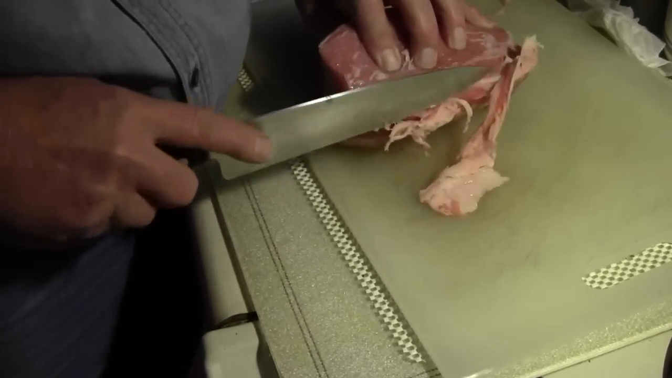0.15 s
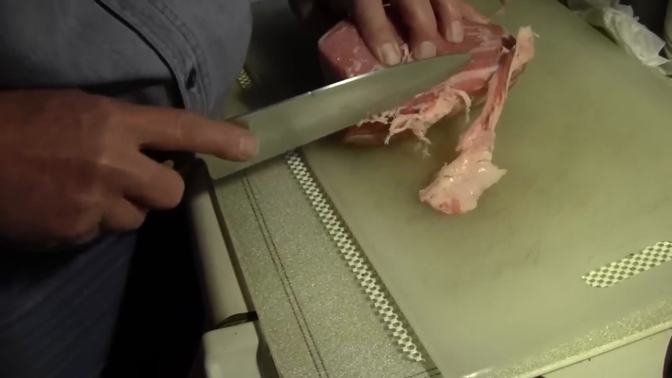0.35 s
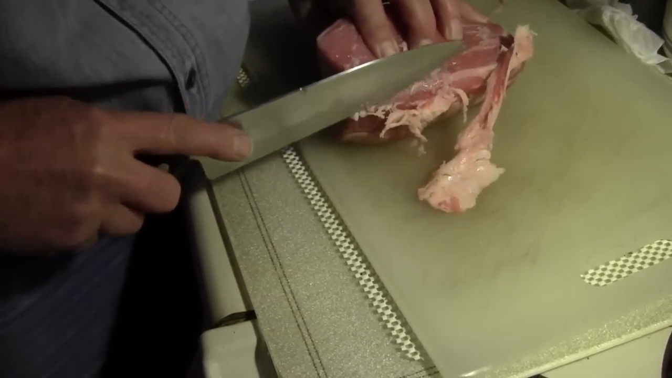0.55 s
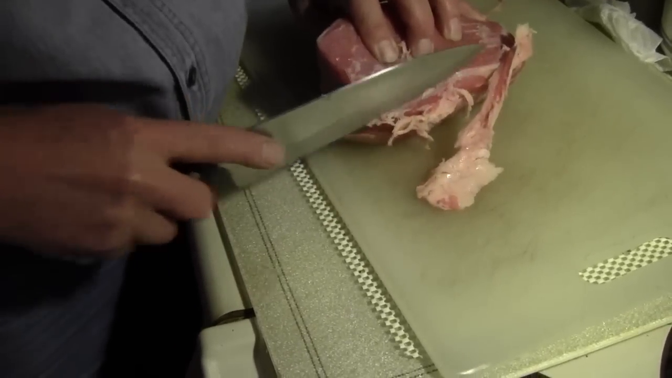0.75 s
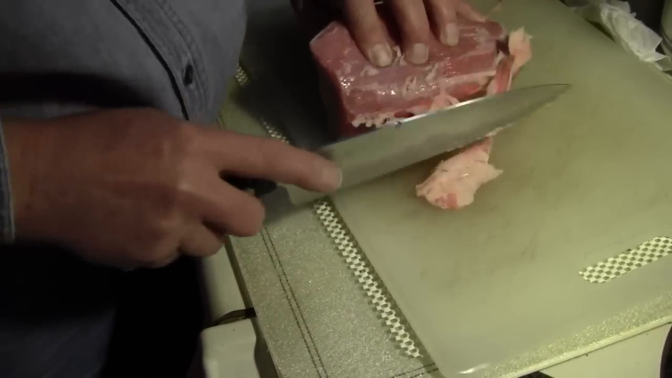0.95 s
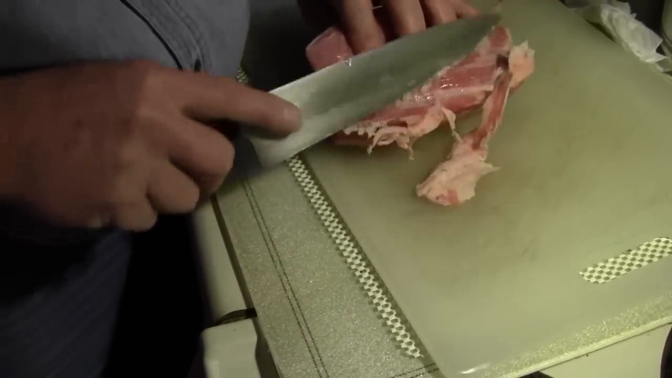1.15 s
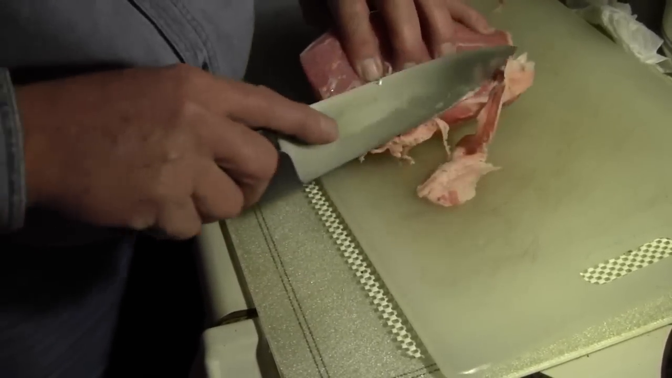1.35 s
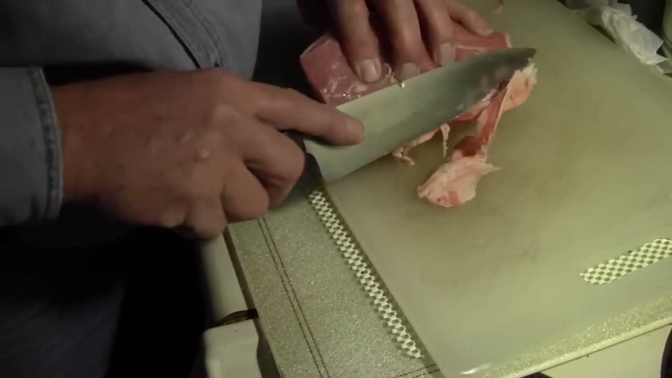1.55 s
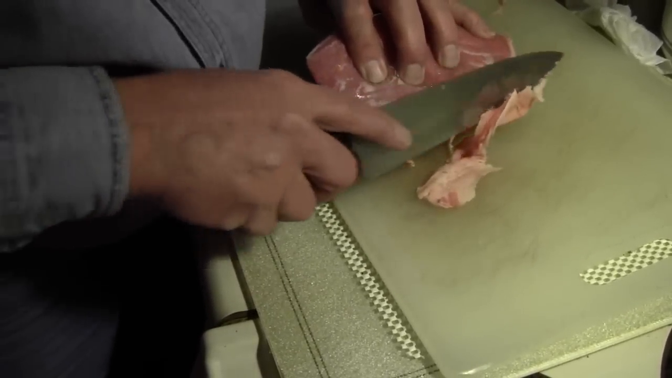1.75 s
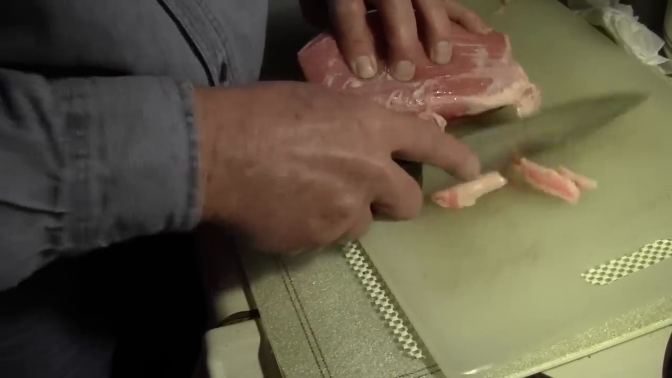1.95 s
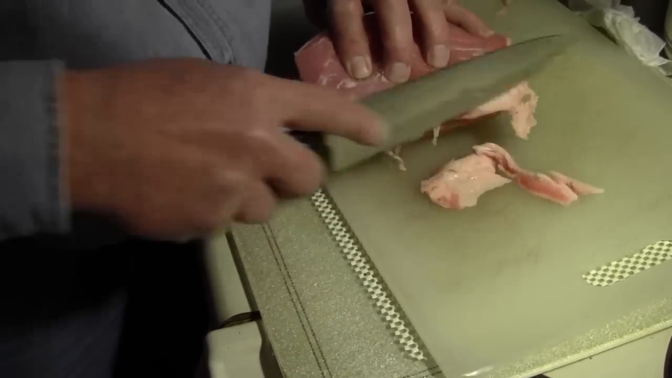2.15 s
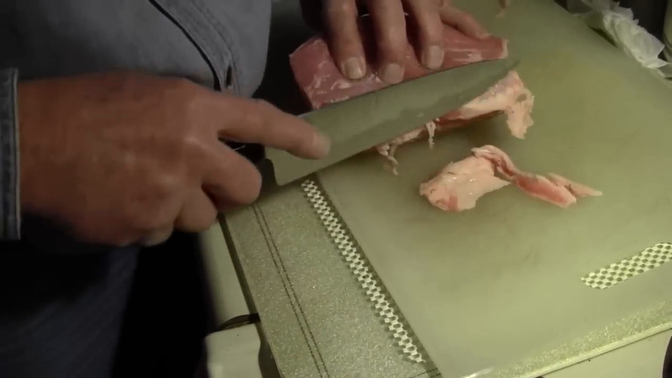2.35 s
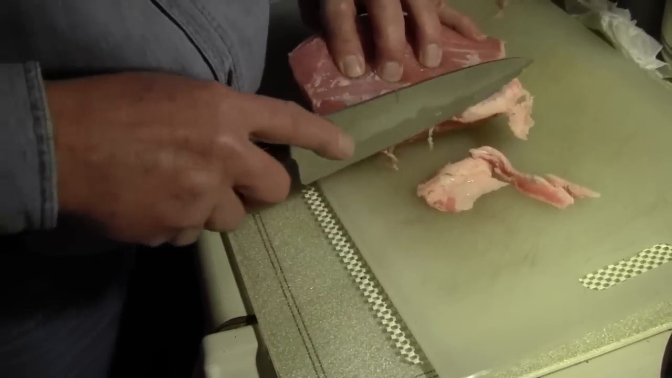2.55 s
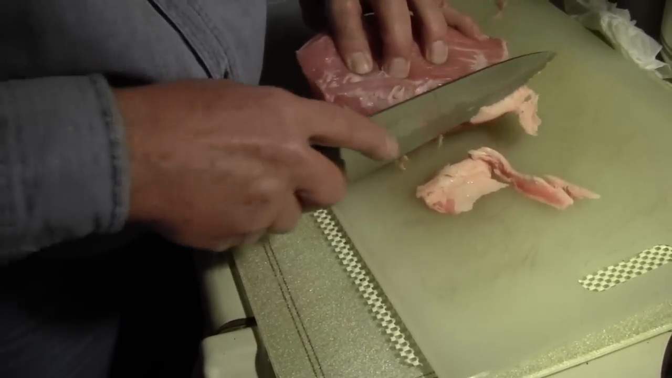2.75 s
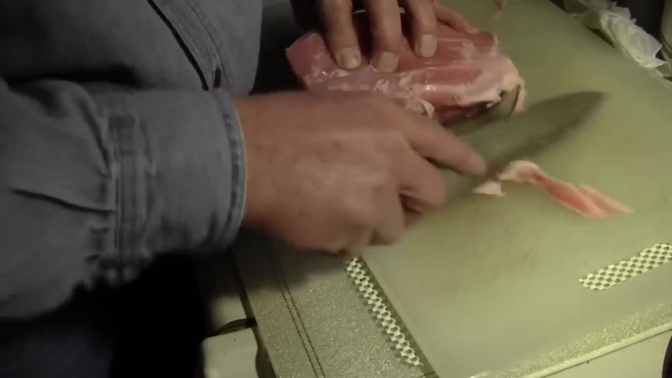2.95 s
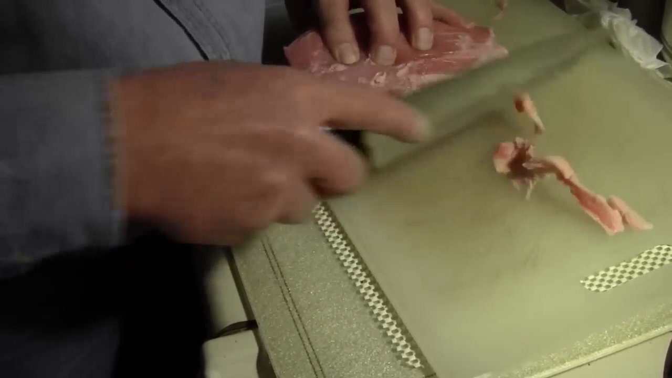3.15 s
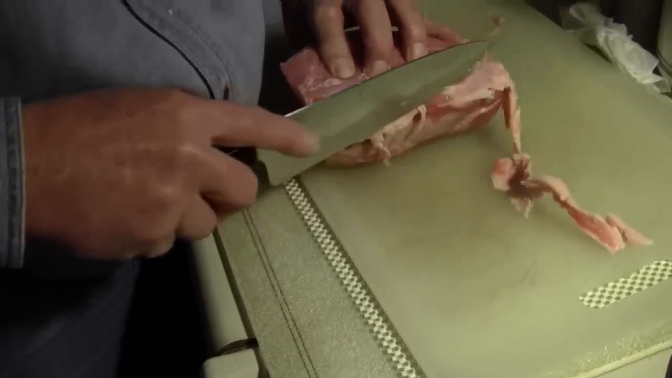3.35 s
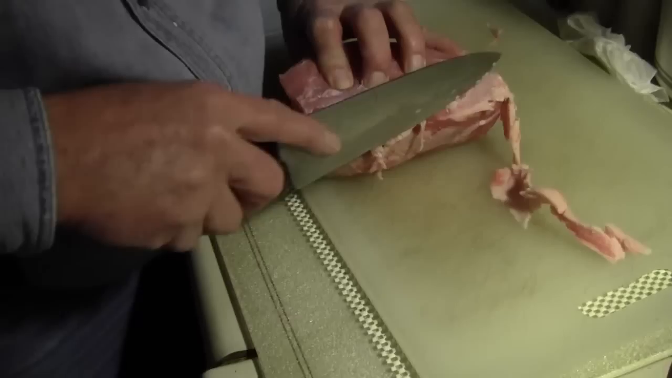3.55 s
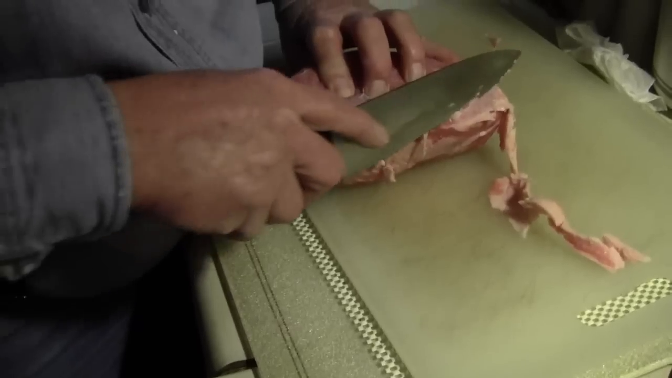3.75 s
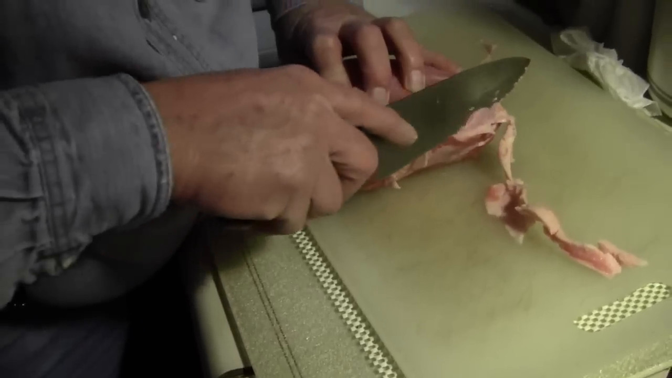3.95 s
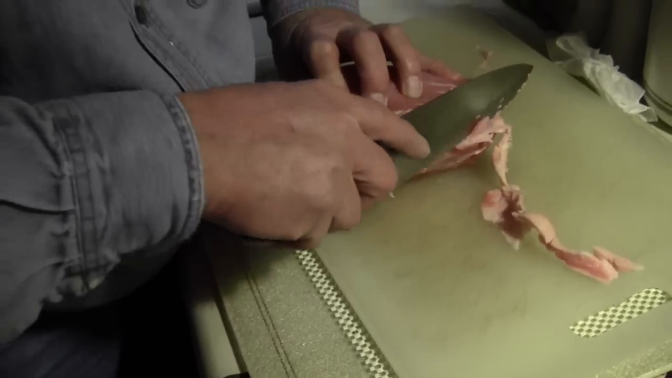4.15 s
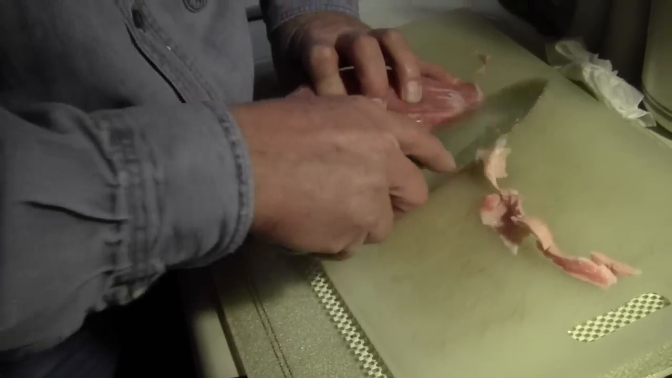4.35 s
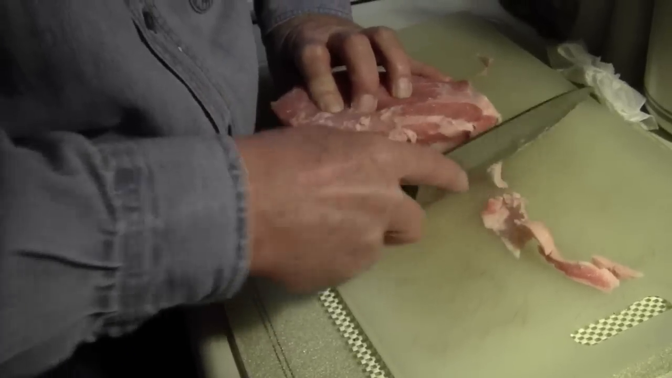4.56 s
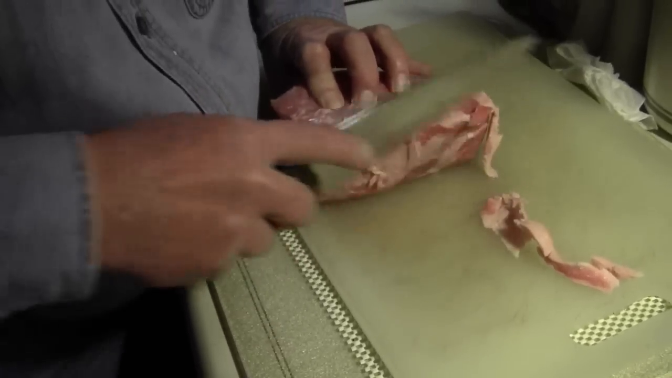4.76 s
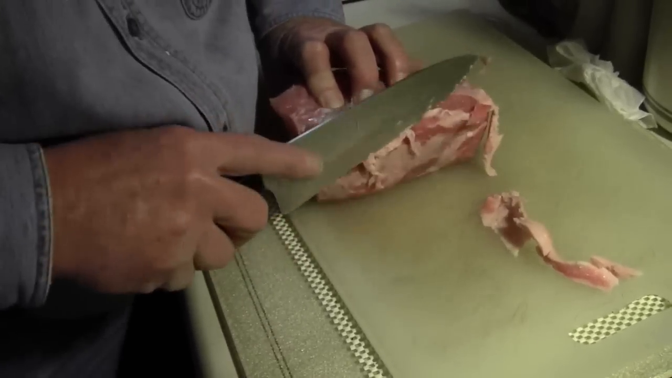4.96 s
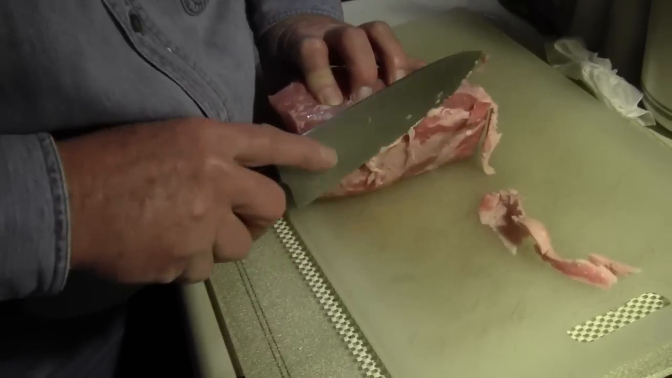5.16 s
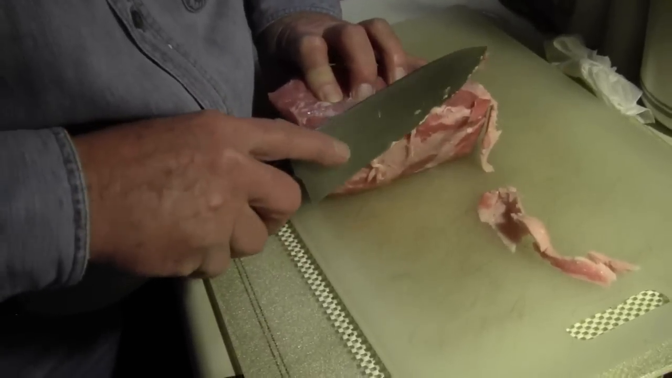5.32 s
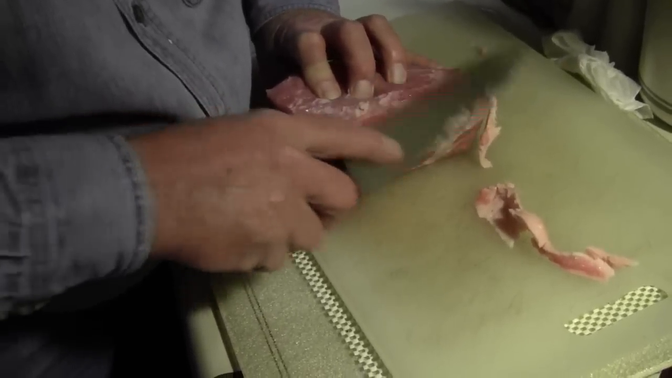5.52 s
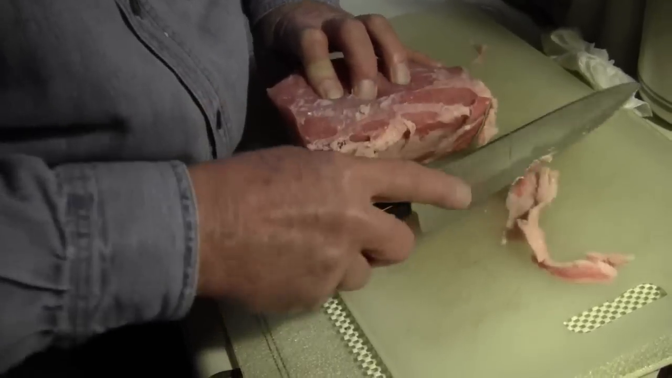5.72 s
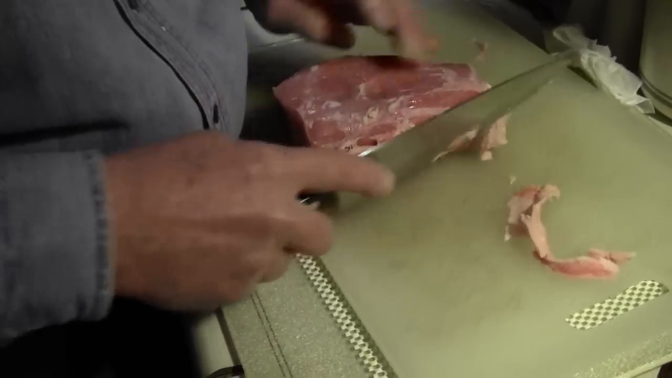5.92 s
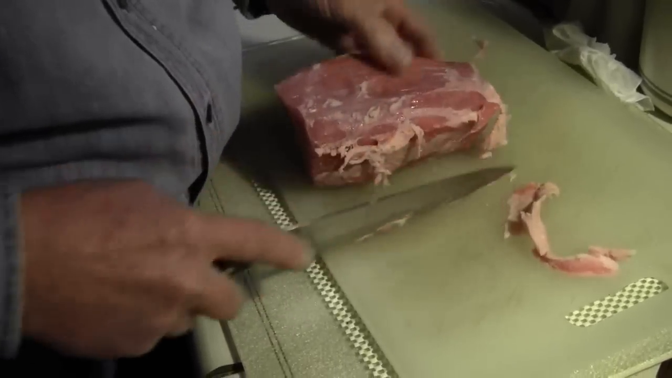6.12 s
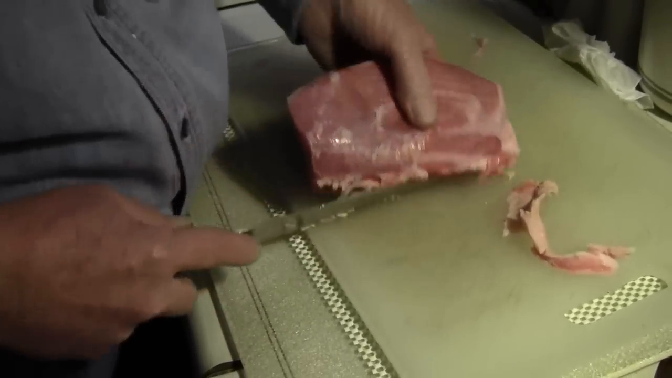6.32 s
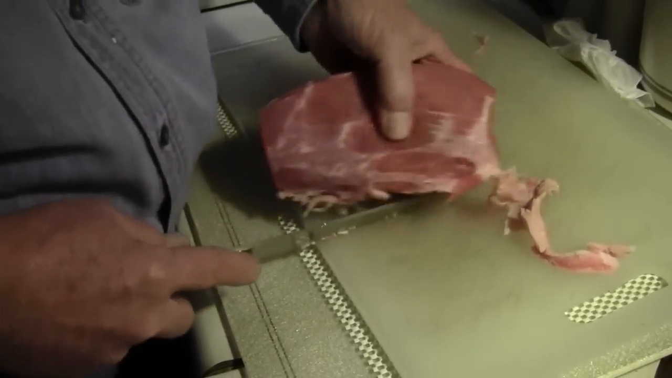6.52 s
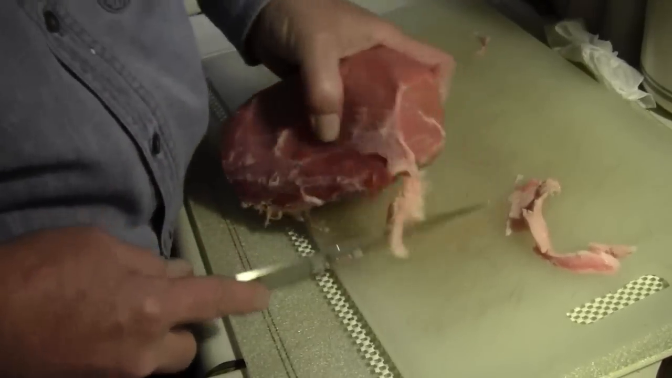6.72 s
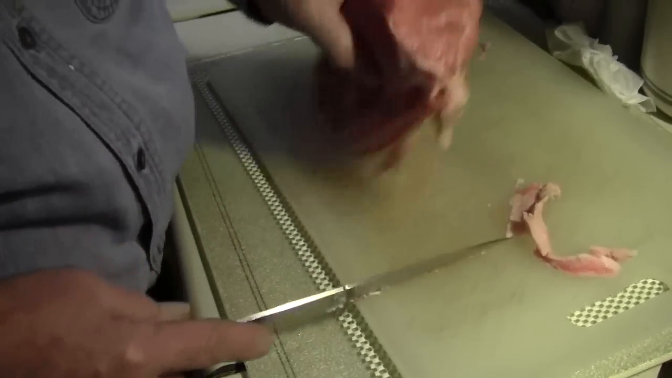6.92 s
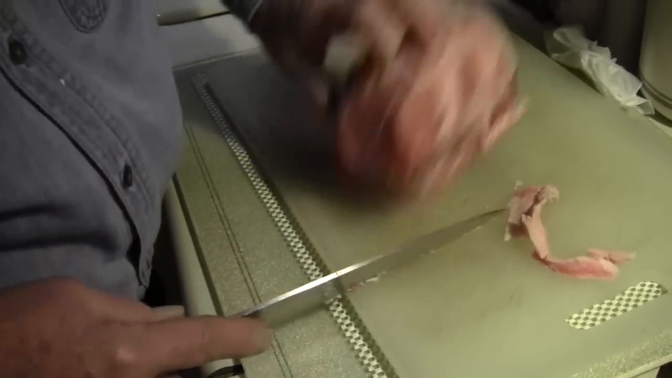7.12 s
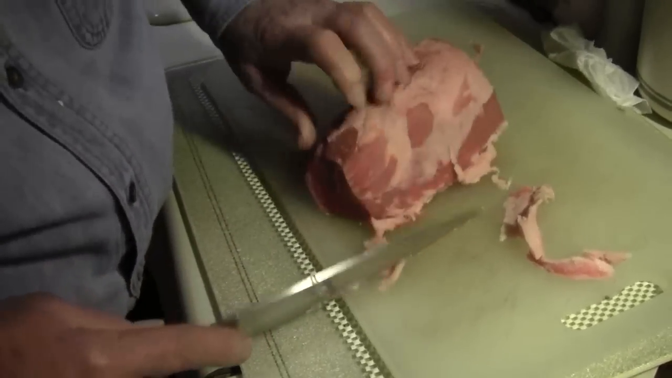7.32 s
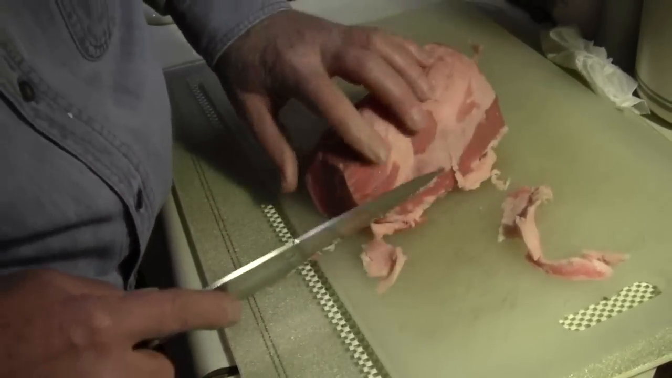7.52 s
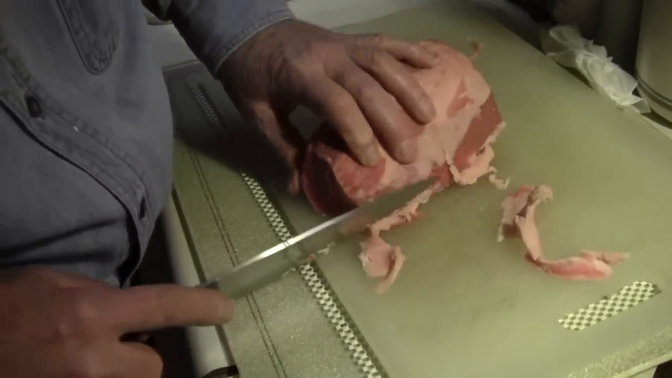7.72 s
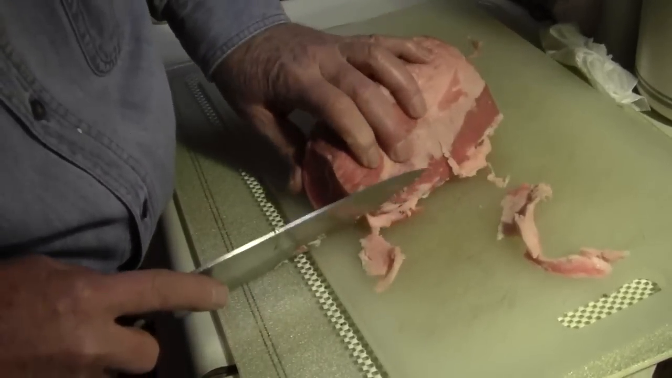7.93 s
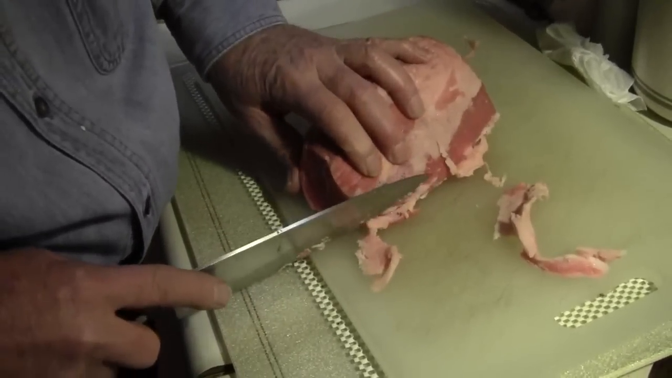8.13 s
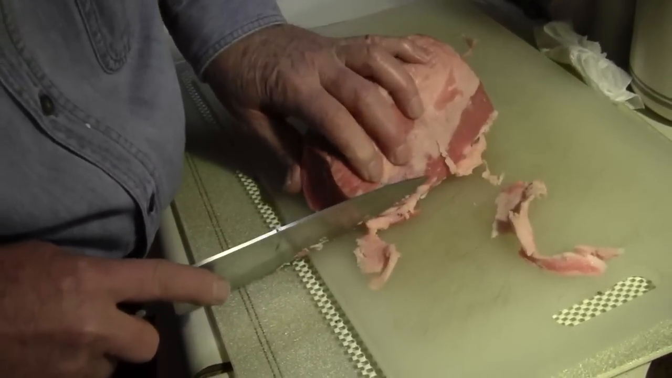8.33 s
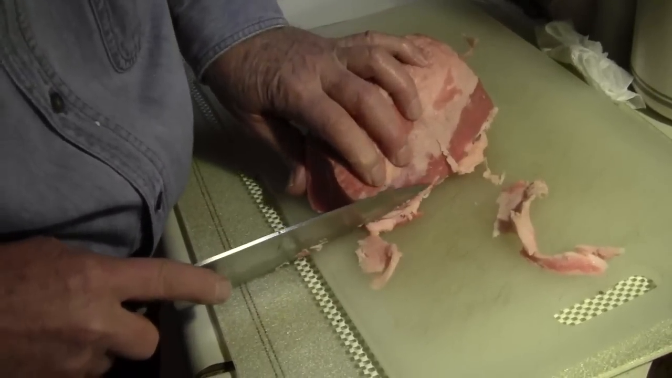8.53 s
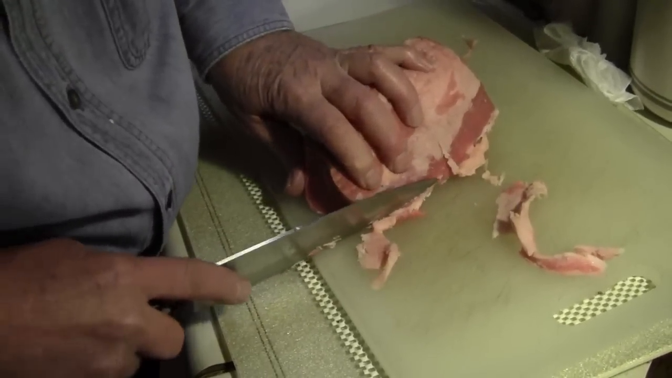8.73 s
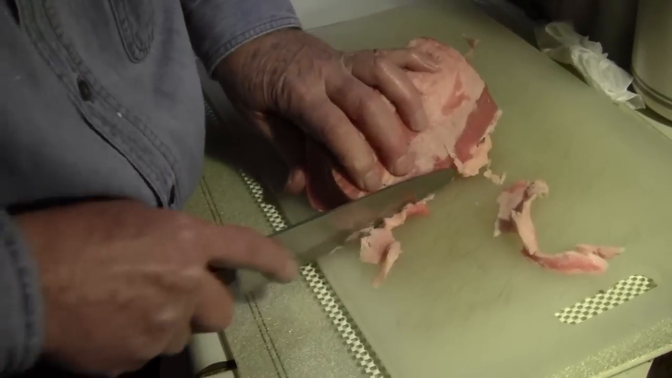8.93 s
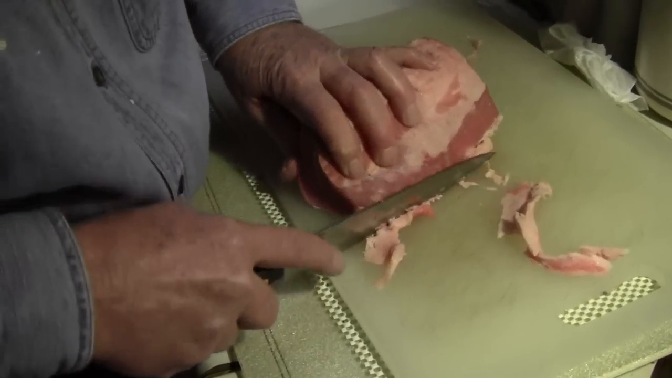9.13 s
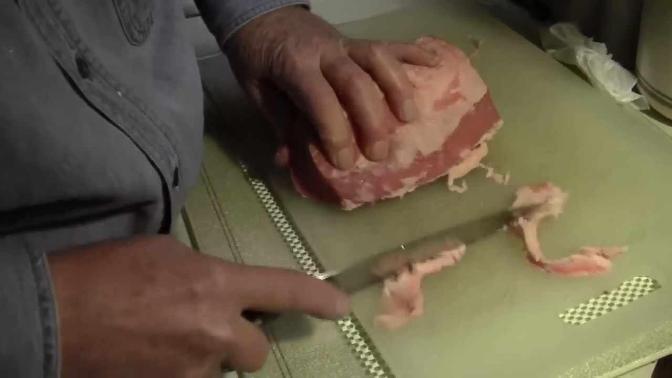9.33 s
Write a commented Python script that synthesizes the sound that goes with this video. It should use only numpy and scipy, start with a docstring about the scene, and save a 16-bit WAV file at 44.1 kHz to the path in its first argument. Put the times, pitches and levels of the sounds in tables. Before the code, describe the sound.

Faint wet slicing and three sharp knife knocks on a plastic board in a small kitchen, then a clattering thud of meat and a scrape.

```python
"""Trimming meat on a plastic board.

A large knife hisses through wet fibres and knocks three times on the board, ringing its modes.
The joint is turned and dropped: the board clatters on the counter with a thin high ring, crockery clinks.
At the end the edge scrapes a scrap aside in stick-slip. Sleeves rustle, an appliance hums faintly,
and the small kitchen reflects the blows and scrapes."""
import sys
import numpy as np
from scipy import signal
from scipy.fft import rfft, irfft
from scipy.io import wavfile

SR = 44100
rng = np.random.default_rng(int(sys.argv[2]) if len(sys.argv) > 2 else 0)


def bounce(signal):
    """Save signal as a 16-bit WAV file at the path given by the first command-line argument."""
    frames = np.transpose(np.atleast_2d(signal))
    limited = np.clip(frames, -1, 1)
    pcm = np.round(limited * 32767).astype(np.int16)
    wavfile.write(sys.argv[1], SR, pcm)


N = 413658
TIME_S = np.arange(N) / SR
BLOW_S = TIME_S[:SR // 3]
BAND_EDGES_HZ = np.geomspace(70, 14000, 24)

# blade hits board: t/s, level/dB, low-pass/Hz, crack/dB, spot f/Hz, spot/dB, thump/dB, thump f/Hz
KNOCKS = [(2.0298, 1, 4400, -15, 2884, -3, -36.5, 126), (3.079, 0.5, 4750, -18, 2300, -15, -30, 113),
          (4.57, -1, 5200, -14, 2550, 1, -28, 107)]
# board touched or clattering: t/s, level/dB, low-pass/Hz, t60/s, counter thump/dB
TAPS = [(4.823, -40, 4980, 0.16, -73), (4.836, -40, 3500, 0.091, -51), (5.774, -49, 600, 0.22, -39.5),
        (6.337, -36, 3600, 0.081, -39), (6.643, -36.5, 2050, 0.07, -67), (6.947, -46.5, 2870, 0.13, -73),
        (7.3259, -18.5, 8600, 0.056, -57), (7.3341, -17.5, 2500, 0.035, -37),
        (7.3370, -13.5, 6600, 0.057, -26), (7.3480, -18, 1200, 0.086, -38), (7.352, -17, 650, 0.023, -38),
        (7.3683, -9.5, 7140, 0.16, -22.5), (7.3878, -14, 5400, 0.02, -38), (7.3946, -13, 4150, 0.052, -33),
        (7.4089, -15.5, 3860, 0.21, -25), (7.445, -23.5, 4630, 0.17, -26), (7.62, -40.5, 5000, 0.17, -39),
        (7.667, -43.5, 3000, 0.11, -42), (7.698, -48.5, 695, 0.044, -48), (7.851, -54, 900, .06, -42.5),
        (8.126, -51.5, 990, 0.14, -47), (8.826, -51.5, 1100, 0.058, -46), (8.9419, -34.5, 9000, 0.049, -55),
        (8.9645, -37.5, 8900, 0.046, -44), (9.009, -45, 5000, 0.055, -44.5), (9.277, -50, 7900, 0.044, -73)]
# ring onsets: t/s, level/dB
JOINT_THUDS = [(6.339, -30), (7.334, -11.5), (7.348, -13.5)]
HIGH_RINGS = [(4.823, -47.5), (4.837, -39), (7.372, -36)]
CROCKERY_CLINKS = [(7.622, -41.5), (7.667, -49.5)]
# movements: peak t/s, level/dB, swell/s, fade/s
WET_STROKES = [(0.02, -62, .2, 0.55), (.5, -64.5, 0.22, 0.67), (.99, -55, 0.2, 0.13),
               (1.42, -58.5, 0.31, 0.51), (2.005, -47.5, 0.11, 0.029), (2.075, -48, .01, .02),
               (2.6, -65.5, 0.51, 0.43), (3.06, -48, 0.098, 0.02), (3.2, -59.5, 0.12, 0.34),
               (4.03, -61.5, 0.31, 0.32), (4.52, -56.5, 0.13, 0.08), (5.68, -58, .14, 0.22),
               (5.96, -59, 0.16, .15), (6.42, -54.5, 0.25, 0.37), (6.76, -57.5, .03, .03),
               (7.31, -59, 0.18, 0.037), (7.82, -54.5, 0.19, 0.34), (8.27, -62, 0.049, .08),
               (9.13, -61, 0.4, 0.88)]  # blade through meat, meat over board
BOARD_DRAGS = [(6.405, -51, 0.026, .13), (8.985, -45, 0.017, 0.043), (9.083, -42, 0.023, 0.039),
               (9.16, -52, 0.055, 0.06), (9.331, -32, 0.0031, .03), (9.358, -23, 0.021, 0.052)]
SLEEVE_SHIFTS = [(1.0, -58.5, .12, 0.14), (1.4, -62, 0.22, 0.16), (3.39, -46, 0.019, 0.059),
                 (5.84, -52, 0.19, .07), (6.02, -55.5, 0.14, .1), (6.45, -53.5, 0.27, 0.11),
                 (6.84, -56, .04, 0.034), (7.6, -51, 0.26, 0.41), (8.27, -53, 0.053, 0.065)]
# modes: f/Hz, level/dB, t60/s
BOARD_MODES = [(292, -22, 0.067), (428, -14, 0.029), (709, -16.5, 0.087), (978, -22.5, 0.13),
               (1190, -10.5, 0.04), (1293, -12, 0.068), (1718, -12.5, 0.043), (2278, -9, 0.027),
               (2477, -14, 0.061), (2935, -12.5, 0.03), (5850, -28, 0.014)]
WEIGHTED_BOARD_MODES = [(165, -10, 0.28), (473, -4.5, 0.065), (688, -2.5, 0.074), (1110, -2, 0.07)]  # under the joint
COUNTER_MODES = [(108.8, -10.5, 0.38), (150, -1, 0.097), (253.6, -5.5, 0.12), (328, -1.5, 0.068)]
HIGH_RING_MODES = [(5740, 4.5, 0.046), (8150, -11, 0.092), (10700, -6, 0.056)]  # thin high ring in the clatter
CROCKERY_MODES = [(1530, -2.5, 0.28), (1870, 1, 0.068), (3227, 3, 0.11), (4360, -9, 0.084),
                  (5370, -14, 0.17), (6648, -14, 0.12)]
# spectral densities: f/Hz, relative level/dB
CROWDED_MODE_SPECTRUM = [(200, -11), (450, -6.5), (700, 2), (930, -1.5), (1150, 0.5), (1700, 0.5),
                         (2600, 1.5), (3400, -4.5), (5500, -6.5), (7500, -6), (10000, -10.5), (13000, -18)]
SLICE_SPECTRUM = [(1500, 4), (3200, 3), (4000, 4), (5300, 3), (9000, 1), (11500, -3.5), (13000, -8.5)]
SCRAPE_SPECTRUM = [(180, -49), (300, -22), (467, -1), (660, -21), (877, -1.5), (1200, -6), (1300, 7),
                   (1410, -4), (2290, -0.5), (2520, -6.5), (2860, -2.5), (3920, -14.5), (4810, -14),
                   (8900, -12), (13000, -33)]
RUSTLE_SPECTRUM = [(80, 4.5), (170, 0), (330, 9.5), (750, 7.5), (1500, -5), (3000, -17), (8000, -30)]
REVERB_SPECTRUM = [(100, -13), (300, -6), (600, -9.5), (1000, -5.5), (1600, -10), (2500, -9), (4000, -11.5),
                   (8000, -11), (12000, -6)]
AIR_SPECTRUM = [(12, -32), (20, -14.5), (48, -1), (92, -3.5), (124, -0.5), (146, -10.5), (172, -5),
                (446, -9.5), (585, -11), (635, -11), (1100, -10.5), (1600, -17), (1940, -14.5), (2410, -18),
                (13400, -43)]
# kitchen decay: f/Hz, t60/s
REVERB_T60 = [(100, 0.72), (400, 0.48), (1000, 0.41), (2500, 0.3645), (5000, 0.39), (12000, 0.38)]
# room tone width: f/Hz, side re mid/dB
AIR_WIDTH = [(60, -20), (110, -15.5), (200, -8.5), (360, -3.5), (650, -4.5), (1200, -7), (2200, -8.5),
             (3800, -8.5), (5000, -26.5), (13000, -29)]
# appliance motor: f/Hz, peak level/dB
HUM_LINES = [(118.4, -64), (236.9, -67), (479.1, -69), (586.8, -64.5), (877.5, -68.5), (1120, -66),
             (1992, -64)]


def knocks(snap_hz=1350, snap_db=1.5, rebound_s=0.0056, hollow_hz=975, hollow_db=-6, hollow_s=0.008):
    """The edge snaps onto the board, which rings, rebounds and sounds hollow against the counter."""
    out = np.zeros(N)
    cycles = snap_hz * BLOW_S
    snap = from_db(snap_db) * np.sin(2 * np.pi * cycles) * (cycles < 1)
    swell = np.sin(np.pi * np.minimum(BLOW_S / hollow_s, 1)) ** 2
    hollow = from_db(hollow_db) * swell * np.sin(2 * np.pi * hollow_hz * BLOW_S)
    for start_s, db, lowpass_hz, crack_db, spot_hz, spot_db, thump_db, thump_hz in KNOCKS:
        body = ring(shifted_board_modes(), from_db(1.5 * rng.standard_normal(len(BOARD_MODES))))
        spot = ring([(spot_hz, spot_db, 0.018)]) * (1 - np.exp(-BLOW_S / 0.0018))
        crack = from_db(crack_db) * crowded_modes(t60_s=0.038, damping=1.0)
        slap = from_db(crack_db - 7) * cut(crowded_modes(t60_s=0.055), 3200)
        # the cabinet takes up the blow slowly
        thump = ring([(thump_hz, thump_db, 0.24)]) * (1 - np.exp(-BLOW_S / 0.017))
        add(out, start_s, from_db(db) * cut(snap + body + spot + crack, lowpass_hz) + thump)
        add(out, start_s + rebound_s, from_db(db) * (hollow + slap))
    return out


def taps(modes_db=-5):
    """Each contact hits another spot of the board; soft ones are dull, heavy ones shake the counter."""
    out = np.zeros(N)
    for start_s, db, lowpass_hz, t60_s, thump_db in TAPS:
        modes = ring(shifted_board_modes(), rng.standard_normal(len(BOARD_MODES)))
        body = from_db(modes_db) * unit_blow(modes)
        tap = unit_blow(cut(body + crowded_modes(t60_s), lowpass_hz))
        thump = ring(COUNTER_MODES, rng.choice([-1, 1], len(COUNTER_MODES)))
        add(out, start_s, from_db(db) * tap + from_db(thump_db) * thump)
    return out


def shifted_board_modes(spread=0.06):
    """Meat and hands load the board differently at each blow, shifting its modes above 1 kHz."""
    hz, db, t60_s = np.transpose(BOARD_MODES)
    shift = spread * np.clip(hz / 1000 - 1, 0, 1) * rng.standard_normal(len(hz))
    return np.column_stack([hz * (1 + shift), db, t60_s])


def crowded_modes(t60_s, damping=0.13):
    """The board's many close modes as noise; highs die first, t60_s holds at 2 kHz."""
    def decay(hz):
        return from_db(-60 * BLOW_S / t60_s * (hz / 2000) ** damping)
    return unit_blow(dying_noise(CROWDED_MODE_SPECTRUM, decay, len(BLOW_S)))


def rings(onsets, modes):
    """The modes ring out from each onset."""
    out = np.zeros(N)
    for start_s, db in onsets:
        add(out, start_s, from_db(db) * ring(modes))
    return out


def scraping(modes_db=-7):
    """The edge, or meat dragged across the board, catches and slips on scored plastic, driving the board's
    modes."""
    slips = clicks(per_s=7000, spread_db=2)
    body = rms_one(cut(signal.oaconvolve(slips, ring(BOARD_MODES))[:N], 820, "high"))
    return movements(BOARD_DRAGS) * (colour(slips, SCRAPE_SPECTRUM) + from_db(modes_db) * body)


def slicing(resting_db=-70.5, flutter_db=1.06, snaps_db=-11, ticks_db=-77, film_hz=8000):
    """Wet fibres part in a soft hiss; tougher ones snap, films of juice break with tiny ticks."""
    fibres = clicks(per_s=8000, spread_db=-0.5)
    snaps = from_db(snaps_db) * clicks(per_s=90, spread_db=1.0)
    speed = np.hypot(movements(WET_STROKES), from_db(resting_db))  # the blade is never quite still
    burst = rng.standard_normal(SR // 200) * np.exp(-TIME_S[:SR // 200] / 0.00081)
    films = signal.oaconvolve(clicks(per_s=18, spread_db=1.5), burst)[:N]
    films = rms_one(cut(films, [film_hz / 2.1, film_hz * 1.35], "band"))
    ticks = from_db(ticks_db) * np.sqrt(rms_one(speed)) * films
    flutter = from_db(flutter_db * drift(rate_hz=60))
    return speed * flutter * colour(fibres + snaps, SLICE_SPECTRUM) + ticks


def rustling(flutter_db=2):
    """Cloth and hands rub, dull and uneven."""
    flutter = from_db(flutter_db * drift(rate_hz=35))
    return movements(SLEEVE_SHIFTS) * flutter * colour(rng.standard_normal(N), RUSTLE_SPECTRUM)


def tail(x, first_s=0.003, plateau_s=0.038):
    """The tail after each blow holds level briefly, then dies band by band."""
    t = TIME_S[:SR // 2]
    onset = np.clip(t / first_s - 1, 0, 1)
    dying_s = np.logaddexp(0, (t - plateau_s) * 100) / 100  # soft knee
    def envelope(hz):
        return onset * from_db(-60 * dying_s / at_hz(REVERB_T60, hz))
    return signal.oaconvolve(x, dying_noise(REVERB_SPECTRUM, envelope, len(t)))[:N]


def appliance_hum(waver_rad=0.76):
    """Motor lines, wavering in phase."""
    return sum(from_db(db) * np.sin(2 * np.pi * hz * TIME_S + waver_rad * drift(rate_hz=12))
               for hz, db in HUM_LINES)


def room_tone(rms_db=-54.5):
    """Steady air noise."""
    return from_db(rms_db) * colour(rng.standard_normal(N), AIR_SPECTRUM)


def ring(modes, strengths=1):
    """Free decay of modes; neighbours swing in opposite directions."""
    hz, db, t60_s = np.transpose(modes)[:, :, None]
    waves = from_db(db - 60 * BLOW_S / t60_s) * np.sin(2 * np.pi * hz * BLOW_S)
    return (strengths * (-1) ** np.arange(len(modes))) @ waves


def movements(rows, drop_db=12, roundness=1.56):
    """Gain of movements, summed in power; each is drop_db down one swell or fade from its peak."""
    power = np.zeros(N)
    for peak_s, db, swell_s, fade_s in rows:
        away = np.maximum((peak_s - TIME_S) / swell_s, (TIME_S - peak_s) / fade_s)
        near = away < 4
        power[near] += from_db(db - drop_db * away[near] ** roundness) ** 2
    return np.sqrt(power)


def dying_noise(spectrum, envelope, size):
    """Third-octave noise bands, each under envelope(hz), with energy set by the spectrum."""
    white = rng.standard_normal((2, size + 2000))
    out = np.zeros(size)
    for k, (low_hz, high_hz) in enumerate(zip(BAND_EDGES_HZ, BAND_EDGES_HZ[1:])):
        hz = np.sqrt(low_hz * high_hz)
        band = cut(white[k % 2], [low_hz, high_hz], "band")[-size:] * envelope(hz)
        flat_gain = np.sqrt(2 * (high_hz - low_hz) / SR / np.sum(band ** 2))
        out += band * flat_gain * from_db(at_hz(spectrum, hz))
    return out


def clicks(per_s, spread_db):
    """Random impulses of uneven size; rms 1."""
    sizes = from_db(spread_db * np.minimum(rng.exponential(1, N), 4)) * rng.choice([-1, 1], N)
    return rms_one(sizes * (rng.random(N) < per_s / SR))


def drift(rate_hz):
    """Straight lines between unit Gaussian values."""
    knots = rng.standard_normal(N // 20)
    return np.interp(TIME_S * rate_hz, np.arange(len(knots)), knots)


def equalise(x, spectrum):
    """Zero-phase filter from a dB table."""
    return irfft(rfft(x) * from_db(at_hz(spectrum, np.arange(N // 2 + 1) * SR / N)), N)


def colour(x, spectrum):
    """Equalise to rms 1."""
    return rms_one(equalise(x, spectrum))


def cut(x, hz, kind="low", order=2):
    """Causal Butterworth filter."""
    return signal.sosfilt(signal.butter(order, hz, kind, fs=SR, output="sos"), x)


def at_hz(points, hz):
    """Table lookup over log frequency."""
    table_hz, values = np.transpose(points)
    return np.interp(np.log(np.maximum(hz, 1)), np.log(table_hz), values)


def add(track, start_s, sound):
    """Mix in from start_s."""
    start = round(start_s * SR)
    track[start:start + len(sound)] += sound[:N - start]


def unit_blow(x):
    """Scale to the energy of 10 ms at rms 1."""
    return x * np.sqrt(SR / 100 / np.sum(x ** 2))


def rms_one(x):
    """Scale to rms 1."""
    return x / np.sqrt(np.mean(x ** 2) + 1e-20)


def from_db(db):
    """Decibels to gain."""
    return 10 ** (np.asarray(db) / 20)


def scene(nearby_s=0.0007, nearby_db=-20, reverb_side_db=-14, side_band_hz=(330, 3500)):
    """Board straight ahead; reflections and room tone differ between the ears."""
    chops = cut(knocks(), 67, "high")  # a small board radiates little deep bass
    wall_chops = cut(knocks(), 65, "high")  # another colour radiates towards the walls
    thuds = rings(JOINT_THUDS, WEIGHTED_BOARD_MODES)
    high_ring = rings(HIGH_RINGS, HIGH_RING_MODES)
    crockery = rings(CROCKERY_CLINKS, CROCKERY_MODES)
    handling = cut(taps() + thuds + high_ring + crockery + scraping(), 65, "high")
    direct = chops + handling
    reverb = tail(handling + np.sqrt(0.5) * chops) + tail(np.sqrt(0.5) * wall_chops)
    mid = direct + reverb + slicing() + rustling() + room_tone() + appliance_hum()
    nearby = from_db(nearby_db) * np.roll(direct, round(nearby_s * SR))  # close surface on one side
    reflections = nearby + from_db(reverb_side_db) * tail(direct)
    side = cut(reflections, side_band_hz, "band", order=6) + equalise(room_tone(), AIR_WIDTH)
    return np.array([mid + side, mid - side])


def record(dry, cutoff_hz=13300):
    """Soft overload on the hardest peaks, then a steep low-pass."""
    rounded = dry / (1 + dry ** 8) ** (1 / 8)
    return cut(rounded, cutoff_hz, order=16)


dry = scene()
out = record(dry)
bounce(out)
```